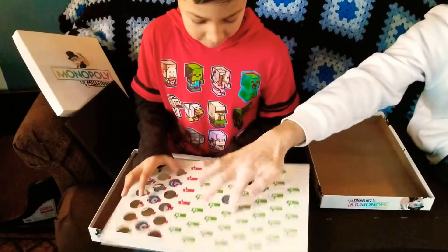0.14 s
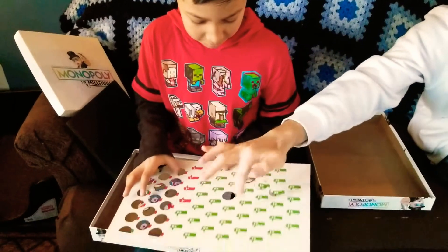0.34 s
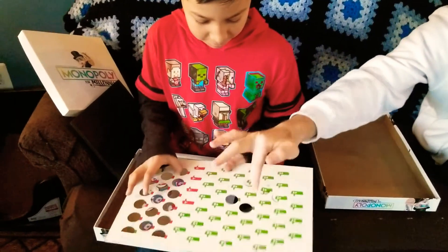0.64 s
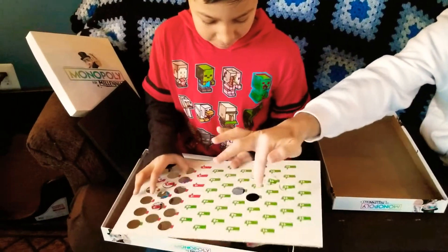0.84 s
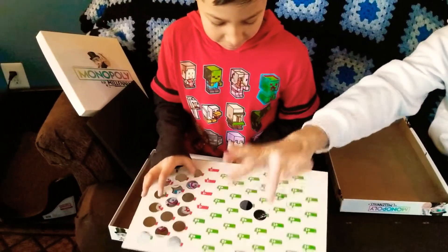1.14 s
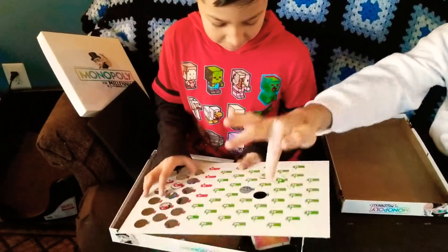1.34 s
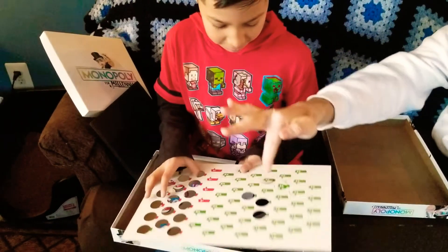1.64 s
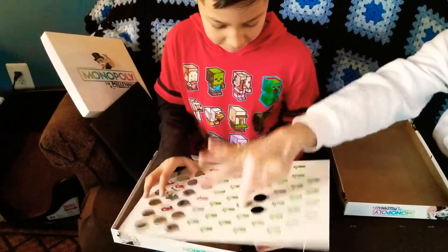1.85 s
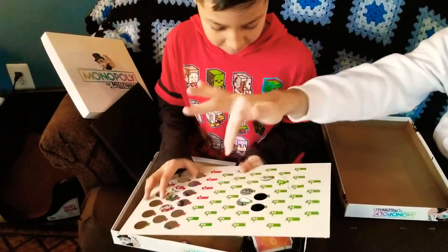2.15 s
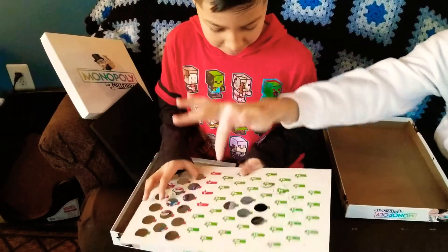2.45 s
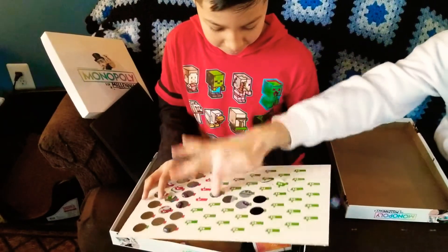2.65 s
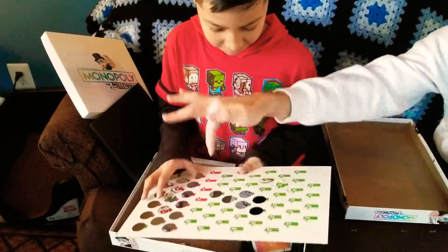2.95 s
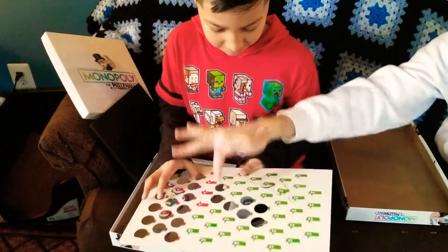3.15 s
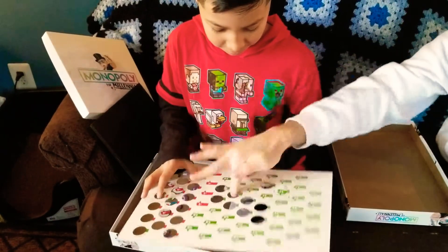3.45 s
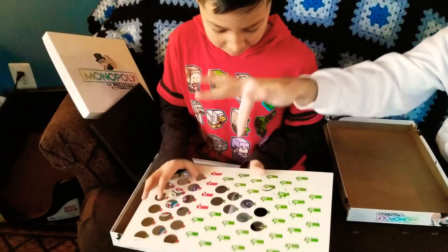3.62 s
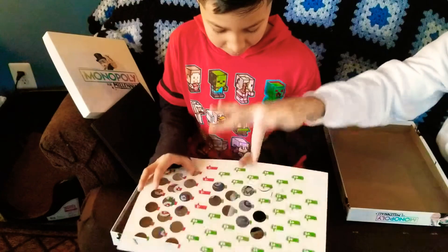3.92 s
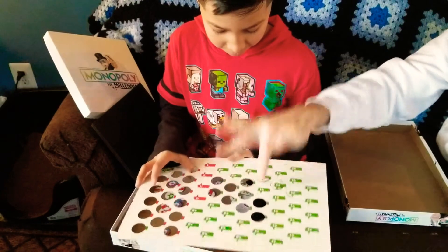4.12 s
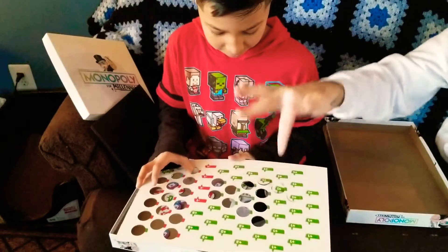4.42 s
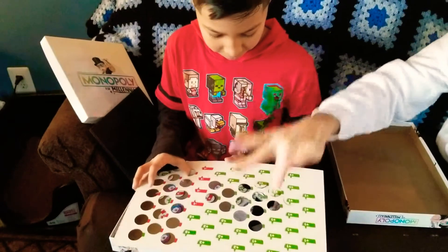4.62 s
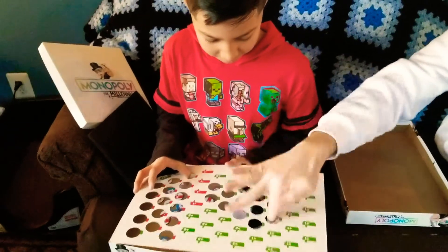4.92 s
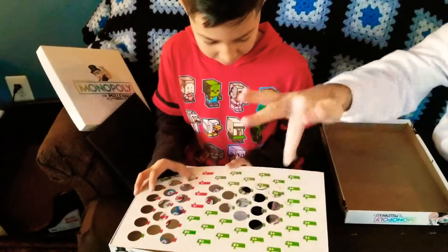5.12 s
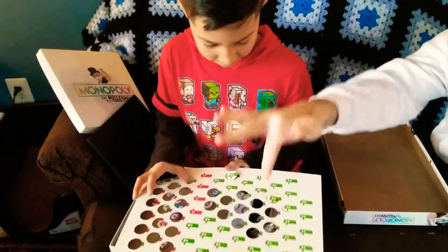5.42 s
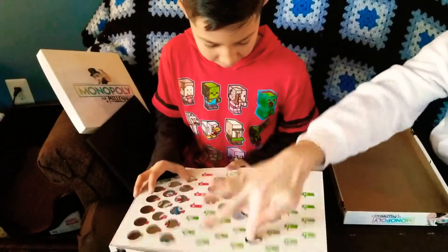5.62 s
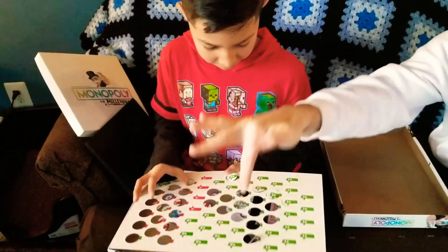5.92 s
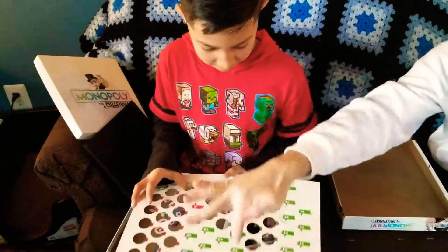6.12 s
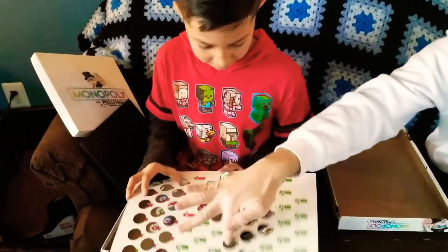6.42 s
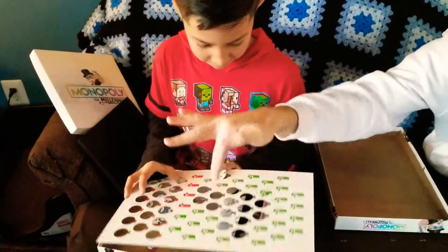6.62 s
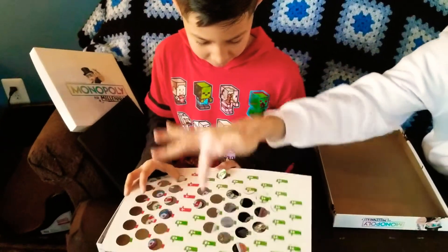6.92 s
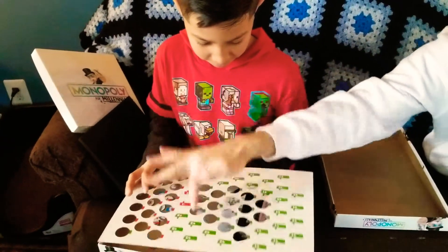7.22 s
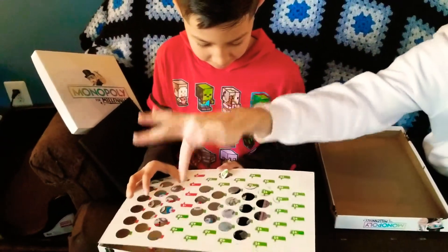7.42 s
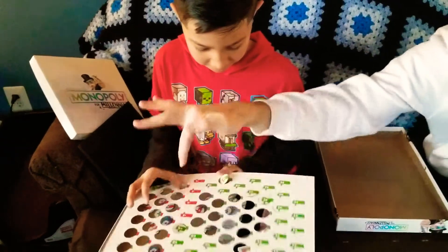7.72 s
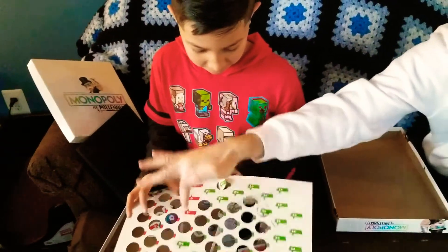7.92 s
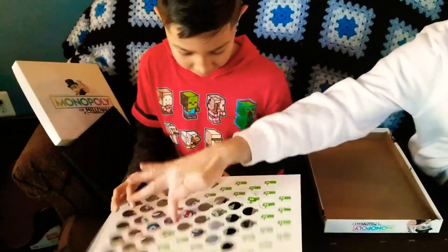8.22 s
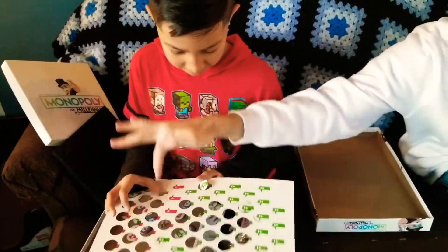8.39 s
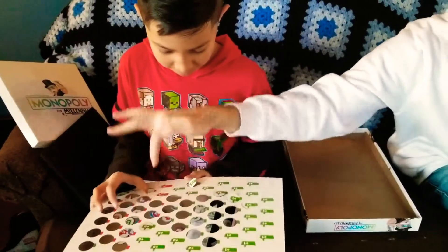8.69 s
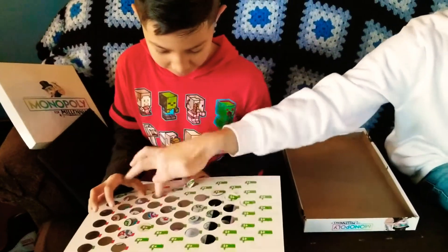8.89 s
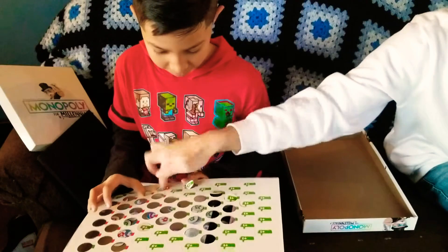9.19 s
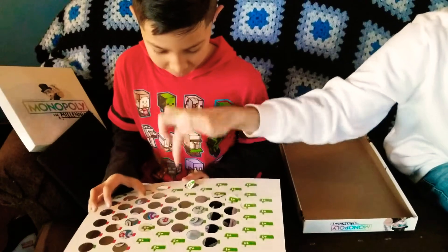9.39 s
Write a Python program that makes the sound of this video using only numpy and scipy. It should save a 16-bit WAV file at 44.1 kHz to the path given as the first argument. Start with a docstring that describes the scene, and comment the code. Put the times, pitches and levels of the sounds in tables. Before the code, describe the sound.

Sharp clicks and snaps of cardboard pieces being punched out one by one, dropping and bouncing in a box indoors.

```python
"""Over faint room hum and microphone hiss, round tokens snap out of a cardboard sheet, one by one.
A finger punches each one through and its tabs tear; the token drops, clacks and bounces in a shallow
box underneath, and the sheet slaps back. Every blow rings the sheet and the hollow box, with a crack
of creasing card and a fizz of fibres. Now and then a hand rubs the sheet, a sleeve brushes it or a
token slides to rest. A furnished room gives the blows a short tail."""
import sys
import numpy as np
from scipy import signal
from scipy.fft import rfft, irfft, next_fast_len
from scipy.io import wavfile
from scipy.ndimage import uniform_filter1d

SR = 44100
rng = np.random.default_rng(int(sys.argv[2]) if len(sys.argv) > 2 else 0)


def file_out(sig):
    """Save sig as 16-bit WAV at sys.argv[1]."""
    # one column per channel
    cols = np.atleast_2d(sig).T
    # limit, then scale
    lim = np.clip(cols, -1, 1)
    pcm = np.round(lim * 32767).astype(np.int16)
    wavfile.write(sys.argv[1], SR, pcm)


N = 421155

# Modes of the cardboard sheet. Each row: pitch in Hz, relative level in dB, t60 in seconds.
SHEET_MODES = [(517, -13, 0.013), (646, -17, 0.11), (774, -20.5, 0.12), (915, -5, 0.044), (1020, 2, 0.059),
               (1280, 12.5, 0.012), (1426, 5.5, 0.027), (1604, 10.5, 0.019), (1845, 23.5, 0.0046),
               (2268, 28, 0.0041), (2710, 27, 0.0042), (3017, 13.5, 0.015), (3530, -3, 0.013),
               (4200, -33, 0.0082)]
# Colour of creasing card. Each row: frequency in Hz, relative level in dB.
CREASE_TONE = [(2000, -4.5), (3300, 6), (4500, 7), (5600, -1.5), (6600, -1), (8000, -8), (10000, -21)]
# Stereo width of noise and reverb. Each row: frequency in Hz, left-right likeness (1 is mono).
LIKENESS = [(60, 0.92), (180, 0.96), (550, 0.98), (1650, 0.12), (4970, 0.28), (15000, 0.02)]


def gain_of(db):
    return 10 ** (np.asarray(db) / 20)


def unit_rms(x):
    return x / np.sqrt(np.mean(x ** 2) + 1e-20)


def curve_at(points, hz):
    """Reads a curve along a logarithmic frequency axis."""
    point_hz, value = np.transpose(points)
    return np.interp(np.log(hz + 1), np.log(point_hz + 1), value)


def coloured(x, tone):
    """Equalises two channels by a tone curve scaled to a mean power gain of 1."""
    size = next_fast_len(N)
    response = unit_rms(gain_of(curve_at(tone, np.fft.rfftfreq(size, 1 / SR))))
    return irfft(rfft(x, size) * response, size)[:, :N]


def low_cut(x, hz):
    """Thins the bass, which a small object radiates poorly."""
    return signal.sosfilt(signal.butter(2, hz, "high", fs=SR, output="sos"), x)


def patchy_noise(tone, patchy_db):
    """Stereo noise of rms 1 whose level drifts in patches across time and frequency."""
    hz = np.fft.rfftfreq(1024, 1 / SR)
    left_re, left_im, apart_re, apart_im, patches = rng.standard_normal((N // 256 + 5, 513, 5)).T
    patches = unit_rms(uniform_filter1d(uniform_filter1d(patches, size=10, axis=0), size=10, axis=1))
    likeness = curve_at(LIKENESS, hz)[:, None]
    left = left_re + 1j * left_im
    right = likeness * left + np.sqrt(1 - likeness ** 2) * (apart_re + 1j * apart_im)
    spectra = np.array([left, right]) * gain_of(curve_at(tone, hz)[:, None] + patchy_db * patches)
    return unit_rms(signal.istft(spectra, nperseg=1024, noverlap=768)[1][:, :N])


def room_hum():
    """Low drones waver slowly in pitch and level, alike in both channels."""
    # Each row: pitch in Hz, width of the waver in Hz, level in dB.
    drones = [(38, 5.9, -63.5), (111.5, 7.7, -61.5)]
    slowness = 1 + (np.fft.rfftfreq(N, 1 / SR) / 3) ** 2  # smooths away movement above 3 Hz
    hum = np.zeros(N)
    for hz, width_hz, db in drones:
        drift, swell = (unit_rms(irfft(rfft(noise) / slowness, N))
                        for noise in rng.standard_normal((2, N)))
        phase = 2 * np.pi * np.cumsum(hz + width_hz / 2 * drift) / SR
        hum += gain_of(db + 2 * swell) * np.sin(phase)
    return hum


def microphone_hiss():
    """A faint, restless noise floor, heaviest in the bass."""
    # Colour of the hiss. Each row: frequency in Hz, relative level in dB.
    hiss_tone = [(12, -45), (20, -18), (117, 10), (440, -8), (616, -16.5), (1020, -15), (1430, -17),
                 (1840, -10.5), (3520, -41.5), (4410, -25.5), (7510, -34.5), (9410, -35), (13900, -28),
                 (15200, -52.5), (16500, -77.5)]
    return gain_of(-56) * patchy_noise(hiss_tone, patchy_db=3.0)


def friction(strokes, tone):
    """Sliding noise: each stroke swells and fades as the hand speeds up and slows."""
    ends_db = -7.5  # either end of a stroke, against its middle
    t = np.arange(N) / SR
    level = sum(gain_of(db + ends_db * (2 * (t - middle) / length) ** 2)
                for middle, db, length in strokes)
    return level * patchy_noise(tone, patchy_db=2.0)


def hand_rubs():
    """Skin slides over card in separate, soft strokes."""
    # Each row: middle in seconds, level in dB, length in seconds.
    strokes = [(.02, -69, .2), (0.263, -64, 0.31), (.58, -55.5, 0.21), (1.2, -62, .2), (1.8, -71, .3),
               (2.08, -59.5, 0.2), (2.82, -58, .3), (3.34, -63, 0.14), (3.635, -59, 0.21),
               (3.95, -63, 0.36), (4.35, -61, .4), (4.6, -64, 0.22), (5.16, -61, 0.11), (6.103, -75, 0.22),
               (6.326, -62.5, 0.19), (6.647, -62, 0.091), (6.892, -49, 0.17), (7.45, -72, 0.17),
               (7.77, -56, .14), (8.3, -66, .2), (8.5, -60, .08), (8.7, -55, 0.18), (8.934, -56, 0.15),
               (9.4, -74, .4)]
    # Colour of skin on card. Each row: frequency in Hz, relative level in dB.
    skin_tone = [(180, -58), (300, -13), (373, -4), (938, -31.5), (1250, -15), (1310, -46), (2030, -13.5),
                 (12600, -26.5), (15700, -24), (16500, -75)]
    return friction(strokes, skin_tone)


def place(mix, start, sound):
    """Adds a stereo sound, the left channel late or early by where the hand is."""
    # The hand's wandering path. Each row: time in seconds, lag of the left channel in milliseconds.
    hand_path = [(0, 0.014), (2, 0.015), (3, -0.046), (4.5, 0.043), (6, 0.03), (7.5, -0.094), (8.1, 0.08),
                 (8.6, -0.12), (9.55, -0.041)]
    lag_s = np.interp(start, *np.transpose(hand_path)) / 1000
    for channel, arrival, part in zip(mix, (start + lag_s / 2, start - lag_s / 2), sound):
        span = channel[round(arrival * SR):][:len(part)]
        span += part[:len(span)]


def resonate(drive, modes):
    """Rings a body's decaying modes, their joint impulse response scaled to peak at 1."""
    t = np.arange(SR // 4) / SR
    ring = sum(gain_of(db - 60 * t / t60) * np.sin(2 * np.pi * hz * t) for hz, db, t60 in modes)
    return signal.oaconvolve(drive, ring[None] / abs(ring).max(), axes=1)[:, :N]


def bump(t, width):
    """A smooth push of unit area."""
    push = np.sin(np.pi * np.clip(t / width, 0, 1)) ** 2
    return push / push.sum()


def chatter(envelope, clump_db):
    """Loose card chatters in clumps: stereo noise with the energy of its envelope."""
    shared, left, right, clumps = rng.standard_normal((4, len(envelope)))
    grain = 0.81 * shared + 0.78 * np.array([left, right])
    grain *= gain_of(clump_db * unit_rms(uniform_filter1d(clumps, size=90)))
    return grain * envelope * np.linalg.norm(envelope) / np.linalg.norm(grain[0] * envelope)


def blows(rows, polarity, contact_s, sheet_push, pan_db, thud_s, box_cut_hz,
          crack_t60, loud_rattle_t60, ring_s, click_db, click_s):
    """Each blow drives sheet, box air, creases and fibres; returns these and, apart, the token's ring."""
    # Modes of the hollow box. Each row: pitch in Hz, relative level in dB, t60 in seconds.
    box_modes = [(122, -29, .15), (164.6, -7, 0.29), (220, 4.5, 0.062), (301, -2, 0.043),
                 (349.7, -1.5, 0.074), (426, 12, 0.023)]
    linger = 0.2  # a fainter rattle lasts longer: dB of t60 gained per dB of level lost
    sheet, box, crease, fibres, token, ticks = np.zeros((6, 2, N))
    t = np.arange(SR // 8) / SR
    since_click = np.maximum(t - .0008, 0)  # the main click comes just after the rattle starts
    rattle_attack = np.minimum(t / (6 * contact_s), 1)  # soft landings gather slowly
    crack_attack = np.minimum(t / (0.00083 + contact_s), 1) ** 2
    ring_swell = np.sin(np.pi * np.clip(t / ring_s, 0, 1) ** 0.86)  # only while the token rocks free
    click = gain_of(click_db) * np.sin(np.pi * np.clip(since_click / click_s, 0, 1)) ** 4
    for start, db, hz, thud_db, crack_db, fizz_db, ring_db, rattle_db in rows:
        rattle_t60 = loud_rattle_t60 * gain_of(-linger * (db + rattle_db))
        rattle = chatter(gain_of(rattle_db - 60 * t / rattle_t60) * rattle_attack, clump_db=2)
        burst = chatter(gain_of(-60 * since_click / crack_t60) * crack_attack, clump_db=5)
        # a low-ringing token rattles duller, and the chatter keeps its pitch roughly alive
        dull_rattle = signal.lfilter(*signal.butter(1, min(1.63 * hz, 9000), fs=SR), rattle)
        rocking = signal.lfilter(*signal.iirpeak(hz, 3.5, fs=SR), rattle)
        push = sheet_push * polarity * bump(since_click, contact_s)
        thud = polarity * (bump(since_click, thud_s) + 0.05 * rattle[[0, 0]])  # centred
        level = gain_of(db + np.array([[.5], [-.5]]) * pan_db)
        place(sheet, start, level * (push + 0.24 * dull_rattle))
        place(box, start, gain_of(db + thud_db) * thud)
        place(crease, start, level * gain_of(crack_db) * (burst + 1.04 * rattle))
        place(fibres, start, level * gain_of(fizz_db) * (burst + .9 * rattle))
        place(token, start, level * gain_of(ring_db) * ring_swell * polarity * np.sin(2 * np.pi * hz * t))
        place(ticks, start, level * (0.98 * rocking + polarity * click))
    # Colour of tearing fibres. Each row: frequency in Hz, relative level in dB.
    fibre_tone = [(6000, -8.5), (8500, -8.5), (10700, -8), (12500, -8), (14200, -4), (15300, -19.5),
                  (16500, -32)]
    card = resonate(sheet, SHEET_MODES) + coloured(crease, CREASE_TONE) + coloured(fibres, fibre_tone)
    boom = low_cut(low_cut(resonate(box, box_modes), box_cut_hz), box_cut_hz)
    return low_cut(card + ticks, 340) + boom, token


def tab_snaps():
    """The finger flexes the whole sheet, slow and deep, and the tabs tear with a drop in pressure."""
    # Each row: start in seconds, level in dB, token pitch in Hz, then thud, crack, fizz, ring and
    # rattle in dB relative to that level.
    snaps = [(0.024, -5.5, 900, -4.5, -31, -25.5, -13.5, -8.5),
             (0.232, -8.5, 970, -4.5, -24.5, -29, -19.5, -8), (0.524, -13.5, 1030, -1.5, -20, -25, -25, -4),
             (1.137, -7, 850, -4, -23.5, -24, -12, -14.5), (1.517, -9, 1150, -7, -23, -20, -20, -10.5),
             (1.937, -11, 903, -3, -18.5, -20.5, -9, -9), (2.343, -8, 950, -9.5, -11.5, -28, -25.5, -10.5),
             (2.733, -8.5, 2230, -14, -18, -20.5, -17.5, -7),
             (3.119, -14.5, 894, -5.5, -25, -16.5, -11.5, -4.5),
             (3.511, -15.5, 1030, -48, -18, -18.5, -11.5, -3.5), (3.87, -19.5, 1070, -10, -14, -28, -19, 3),
             (4.232, -10.5, 1280, -6.5, -24, -11.5, -37, -12.5),
             (4.595, -5.5, 1880, -42, -16.5, -15, -12, -16.5), (4.965, -9, 1740, -6.5, -16, -33, -14, -6),
             (5.336, -17, 2440, -0.5, -6.5, -24.5, -8, -16.5),
             (5.704, -10.5, 1310, -9.5, -17, -28, -32, -12), (6.1, -14.5, 1265, -3, -18, -22.5, -26, -14),
             (6.466, -16.5, 2370, -7.5, -19.5, -13.5, -10, -5.5),
             (6.84, -9.5, 1465, -10.5, -20, -17, -20, -9.5), (7.215, -17, 1890, -5, -16, -14.5, -1.5, -3),
             (7.573, -10, 1840, -12, -11, -20, -5.5, -10), (7.918, -17, 1016, -1, -12.5, -15, -27, -16),
             (8.596, -25.5, 2340, -12.5, 1.5, -12, 3, -6.5), (8.938, -13, 2450, -7, -13, -20, -24, -14),
             (9.248, -17.5, 1700, -15, -15, -20, -9.5, -17), (9.534, -26.5, 2730, -7, -13, -24, -7, -13)]
    return blows(snaps, polarity=-1, contact_s=0.00025, sheet_push=.6, pan_db=.3,
                 thud_s=0.0042, box_cut_hz=93, crack_t60=.01, loud_rattle_t60=.045,
                 ring_s=0.0043, click_db=-7, click_s=.0003)


def landing_knocks():
    """Tokens and sheet land and bounce, each a brief rap on the box that starts with a pressure rise."""
    # Each row: start in seconds, level in dB, token pitch in Hz, then thud, crack, fizz, ring and
    # rattle in dB relative to that level.
    knocks = [(0.063, -3, 800, -7.5, -25.5, -38, -18, -4), (0.282, -4, 826, -4.5, -18, -31.5, -7, -1.5),
              (0.579, -26.5, 1900, -1, -18, -18, -11, -3), (0.626, -25.5, 815, 0, -27, -36, -5, -6),
              (0.649, -19.5, 960, -28, -43, -47, -15, -7), (0.703, -14, 2010, -26, -18, -35, -13, -4.5),
              (0.75, -16.5, 1640, -37, -24, -41, -16, -8), (0.79, -29, 1310, -29, -19, -40, -9, -7),
              (0.837, -26, 920, -36, -30, -47, -17, -9.5), (0.866, -37, 910, -28, -21, -48, -10, -0.5),
              (1.042, -42, 1520, -16, -15, -46, -7, -4), (1.173, -2, 875, -10, -29, -45, -10.5, -4.5),
              (1.188, -21, 895, 1, -14.5, -17, -5, -7), (1.555, -19.5, 1780, -29, -2, -13.5, -13, -5),
              (1.561, -4, 955, -23, -35, -43, -15, -2), (1.682, -18.5, 875, -14, -32, -47, -10, -9),
              (1.722, -24, 900, -1.5, -33, -53, -3.5, -5.5), (1.76, -18.5, 810, -51, -34, -66, -16, -9.5),
              (1.818, -22, 1210, -36, -41, -48, -16, -16), (1.832, -31, 1230, -8, -33, -42, -11, -9),
              (1.868, -17, 1590, -15.5, -34, -45, -12, -20), (1.918, -13.5, 950, -23, -31, -53, -13, -12),
              (1.975, -15, 1780, -15, -21, -21, -7.5, -13), (2.115, -31.5, 1260, -18, -18, -47, -16, -7),
              (2.152, -27, 990, -27, -22, -50, -12, -5.5), (2.18, -27, 2270, -18, -18, -36, -5.5, -10.5),
              (2.193, -27, 1600, -25, -17, -40, -7.5, -7.5), (2.24, -30, 1190, -21, -18, -34, -11, -6.5),
              (2.256, -23.5, 2350, -35, -18, -23, -5.5, -10.5), (2.264, -22, 1660, -32, -15, -27, -7, -9.5),
              (2.362, -13, 1010, -12, -21, -17, -20, -6), (2.415, -6.5, 2210, -39, -20, -42, -22, 2),
              (2.534, -10, 1170, -33, -29, -61, -21, -8.5), (2.563, -28.5, 1040, -9, -18, -35, 1, -8),
              (2.599, -19.5, 910, -7.5, -24, -42, -11, -9.5), (2.659, -34, 910, -18, -14, -35, -9, -3),
              (2.674, -36, 920, -12, -23, -33, -13, -4), (2.706, -32, 1290, -26, -29, -37, -11, -8),
              (2.725, -17, 1640, -41, -25, -31, -4.5, -2), (2.758, -17, 1060, -13.5, -18, -16, -15.5, -7.5),
              (2.812, -13.5, 950, -25, -29, -21, -16, -12), (2.834, -7, 1700, -34, -18.5, -13, -2.5, -8.5),
              (3.194, 2.5, 1520, -37, -24.5, -30.5, -13.5, -7), (3.24, -24, 850, -7, -43, -36, -9, -19),
              (3.261, -13.5, 1620, -38, -44, -50, 3.5, -20), (3.326, -15.5, 1790, -26, -25, -37, -3.5, -3),
              (3.333, -15, 1500, -25, -17.5, -32, -8, -12), (3.34, -31, 1680, -25, -24, -36, 5, -7),
              (3.385, -22.5, 1620, -23, -37, -41, -8, -9), (3.577, -18.5, 1570, -20, -25, -22, -8, -3),
              (3.597, -6, 907, -23, -25.5, -28.5, -9.5, -3), (3.711, -25, 820, 0, -21, -34, -10, -4),
              (3.745, -30.5, 840, -7, -26, -32, -9, -5), (3.825, -30.5, 910, -8, -22, -25, -10, -10),
              (3.876, -15.5, 961, -15, -24, -15, -17, -9), (3.888, -25, 2320, -7, -3.5, -1, -3, -9),
              (4.028, -36, 1670, 9, -23, -24, -13, -5.5), (4.061, -30.5, 930, 3, -19, -20, -16, -10),
              (4.11, -7.5, 1870, -23, -32, -61, -19.5, -16.5),
              (4.192, -19.5, 2230, -32, -26, -34, -21, -6.5), (4.622, -28, 1440, -25, -26, 4.5, -12, -13),
              (4.695, -14.5, 1530, -35, -16.5, -26, -5, -7.5),
              (4.817, -24, 1660, -31, -22.5, -38, -14, -17.5), (4.865, -42.5, 780, 6, -28, -48, -1, -16.5),
              (5.02, -10.5, 1630, -34, -42, -32, -28, -17), (5.067, -7.5, 1924, -40, -11.5, -33, -7.5, 0),
              (5.084, -11, 902, -29, -27, -19, -17, -10), (5.151, -21.5, 1390, -17, -25, -40, -7.5, -2.5),
              (5.203, -28.5, 930, -17, -20.5, -31, -20, -2.5), (5.253, -33, 1450, -21, -20, -45, -4, -3.5),
              (5.398, -8.5, 897, -9, -29, -36, -10, -5), (6.152, -2.5, 947, -7, -25.5, -39, -14, -5),
              (6.546, 2.5, 1180, -17, -24.5, -39, -39, -7.5), (6.631, -21.5, 1690, -44, -25, -38, -8, -12),
              (6.695, -16, 2160, -49, -31, -9, -18, -7), (6.737, -23, 1150, -8.5, -8.5, -44, -28, -4.5),
              (6.764, -36, 2280, -13, -15, -27, -5, -9), (6.777, -16.5, 1580, -24, -15, -44, -8, -7.5),
              (6.818, -18, 2330, -31, -24, -38, -9, -17), (6.944, -10.5, 830, -6.5, -23.5, -27, -11.5, -8),
              (7.013, -28, 1200, -7, -25, -13, -10, -7.5), (7.059, -40, 853, -3, -12, 0, -19, -10),
              (7.242, -20.5, 2370, -12, -11, -3, -6, -10), (7.354, -2.5, 2000, -47, -15, -40, -10.5, -7.5),
              (7.367, -8, 1510, -50, -29, -27, -9.5, -7), (7.435, -17.5, 2140, -35, -22, -42, -9.5, -3.5),
              (7.949, -25.5, 1910, -11, -20, -7.5, -10, -6.5), (7.974, -39, 1700, 6, -2, -17.5, -2, -14),
              (8.009, 1.5, 1150, -9.5, -25.5, -39, -23, -9.5),
              (8.184, -34.5, 1830, -15, -27, -37, -7.5, -7), (8.233, -40, 2640, -8, -15, -27, -6, -12),
              (8.289, -35, 1070, -10, -24, -17, -16, -7), (8.344, -37.5, 1720, -7.5, -21, -9, -1.5, -10.5),
              (8.562, -38, 1800, -15, -25, -40, -6, -8), (8.618, -15.5, 1800, -22, -27, -1.5, -7, -14),
              (8.677, 0.5, 2250, -24, -28, -44, -12, -11), (8.709, -8.5, 1460, -16.5, -22, -15.5, -15, -7),
              (8.838, -25.5, 980, -28, -20, -47, -29, -1.5), (8.967, -23.5, 2480, -14, -19, -20, -5, -6),
              (9.013, 1, 1570, -26, -23, -46, -2, -14), (9.033, -10, 1620, -39, -15, -32, -20, -2),
              (9.136, -12, 1280, -38, -29, -55, -17.5, -22), (9.255, -22, 2550, -6.5, -14, -9.5, -23, -3.5),
              (9.27, -25, 1010, -10, -22, -10, -16, -4), (9.321, -2.5, 1602, -37, -24, -39, -1.5, -7.5),
              (9.363, -27, 1800, -10, -7, -10.5, -14, -11), (9.393, -25, 1430, -24, -27, -44, -5, -5)]
    return blows(knocks, polarity=1, contact_s=.00042, sheet_push=.95, pan_db=1.2,
                 thud_s=0.00087, box_cut_hz=164, crack_t60=0.016, loud_rattle_t60=.036,
                 ring_s=0.0047, click_db=-26, click_s=.0006)


def sleeve_brushes():
    """A sleeve grazes the card with a thin, high whisper."""
    # Each row: middle in seconds, level in dB, length in seconds.
    brushes = [(.42, -64, .2), (1.07, -68, .12), (2.12, -60, .3)]
    # Colour of cloth on card. Each row: frequency in Hz, relative level in dB.
    cloth_tone = [(3000, -45), (3900, -6), (4800, -1), (5600, -5), (6500, -35)]
    return friction(brushes, cloth_tone)


def token_scuffs():
    """A token rocks and slides to rest: soft swells of grain through the sheet, with no blow."""
    # Each row: start in seconds, level in dB, crack in dB relative to that level, length in seconds.
    scuffs = [(1.093, -41, -20, 0.028), (4.183, -23, -24, 0.022), (4.28, -26, -21, 0.035),
              (4.375, -23.5, -24.5, 0.032), (4.45, -23.5, -23, 0.025), (4.507, -27.5, -25, 0.045),
              (4.573, -24, -24, 0.02), (6.645, -38, -17, .025), (6.679, -33, -10, 0.017),
              (6.916, -27, -19, 0.028), (8.279, -45, -12, 0.022), (8.33, -37.5, -18, 0.029)]
    sheet, crease = np.zeros((2, 2, N))
    for start, db, crack_db, length in scuffs:
        grain = gain_of(db) * chatter(np.hanning(round(length * SR)), clump_db=3)
        place(sheet, start, 0.081 * grain)
        place(crease, start, gain_of(crack_db) * grain)
    return low_cut(resonate(sheet, SHEET_MODES), 800) + coloured(crease, CREASE_TONE)


def room_reverb(x):
    """Sparse reflections die band by band; three tails take turns, as the source moves a little."""
    # Decay of the furnished room. Each row: frequency in Hz, t60 in seconds.
    decay_times = [(100, 0.38), (300, 0.34), (800, 0.39), (2000, 0.29), (5000, 0.3), (13000, 0.24)]
    predelay, spacing = 200, 20  # samples
    slots = np.arange(predelay, SR // 2, spacing)
    arrivals = slots + rng.integers(0, spacing, (3, 2, len(slots)))
    taps = np.zeros((3, 2, SR // 2 + 2 * spacing))
    np.put_along_axis(taps, arrivals, rng.choice([-1., 1.], arrivals.shape), 2)
    hz, t, spectra = signal.stft(taps, SR, nperseg=512)
    shared = curve_at(LIKENESS, hz)[:, None] ** 2
    spectra[:, 1] = shared * spectra[:, 0] + np.sqrt(1 - shared ** 2) * spectra[:, 1]
    decay = gain_of(-60 * t / curve_at(decay_times, hz)[:, None])
    tails = signal.istft(spectra * decay, SR, nperseg=512)[1]
    tails[..., :predelay] = 0
    turn = 2 * np.pi * 1.3 * np.arange(N) / SR
    wet = np.zeros((2, N))
    for k, tail in enumerate(tails):
        send = x * np.sqrt(2 / 3) * np.cos(turn + k * np.pi / 3)
        wet += signal.oaconvolve(send, tail / np.linalg.norm(tail[0]), axes=1)[:, :N]
    return wet


def scene():
    """Snaps, knocks and scuffs sound in the room; rubbing, hiss and hum lie dry beneath them."""
    snaps, snap_rings = tab_snaps()
    knocks, knock_rings = landing_knocks()
    card = snaps + knocks + token_scuffs()
    token = snap_rings + knock_rings
    # the token's ring has less room echo than the card
    echo = gain_of(-5.5) * room_reverb(card + gain_of(-3.5) * token)
    return card + token + echo + hand_rubs() + sleeve_brushes() + microphone_hiss() + room_hum()


def record(dry):
    """Two microphones lean left or right by band; the loudest peaks round off; the top end is cut."""
    # Balance of the microphone pair. Each row: frequency in Hz, left over right in dB.
    balance = [(30, 2), (300, 2.3), (700, 2.5), (1400, -1.6), (2800, -3), (5600, 0), (10000, -2.2),
               (14000, -4.4)]
    ceiling, top_hz = .95, 16700
    size = next_fast_len(N)
    lean_db = curve_at(balance, np.fft.rfftfreq(size, 1 / SR)) * np.array([[.5], [-.5]])
    leaned = irfft(rfft(dry, size) * gain_of(lean_db), size)[:, :N]
    rounded = leaned / (1 + abs(leaned / ceiling) ** 4) ** .25
    high_cut = signal.firwin(511, top_hz, window=("kaiser", 13), fs=SR)
    return signal.oaconvolve(rounded, high_cut[None], "same")


dry = scene()
out = record(dry)
file_out(out)
```